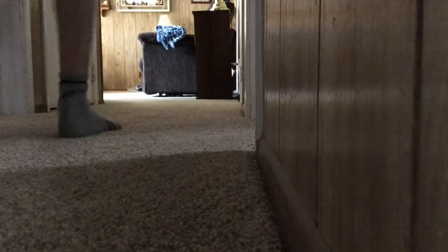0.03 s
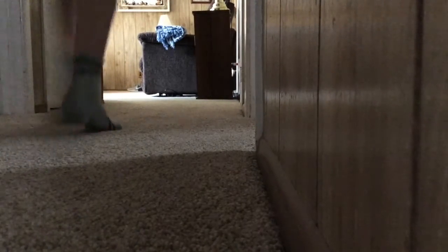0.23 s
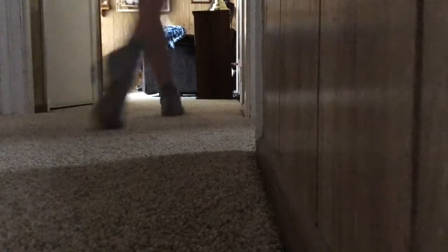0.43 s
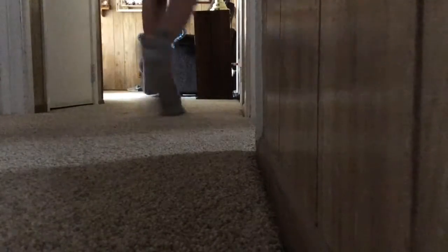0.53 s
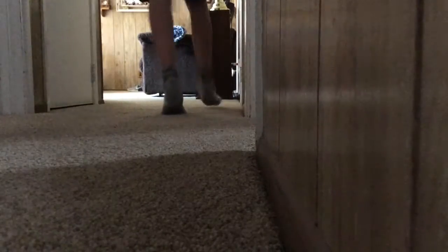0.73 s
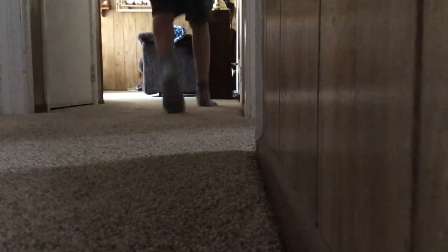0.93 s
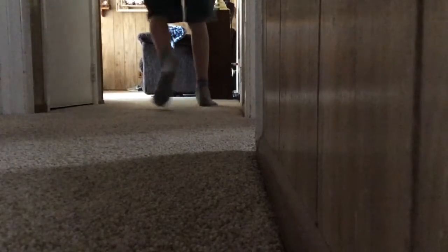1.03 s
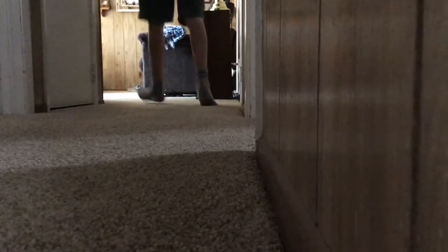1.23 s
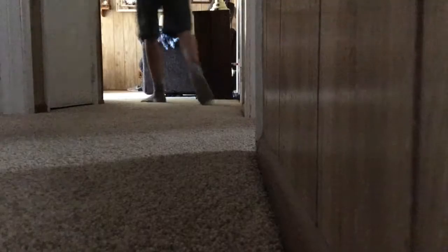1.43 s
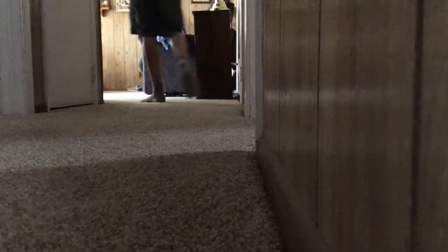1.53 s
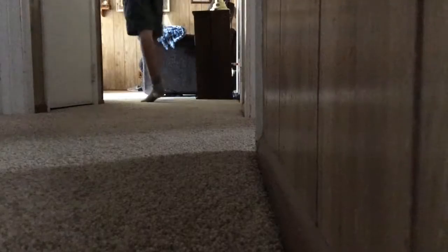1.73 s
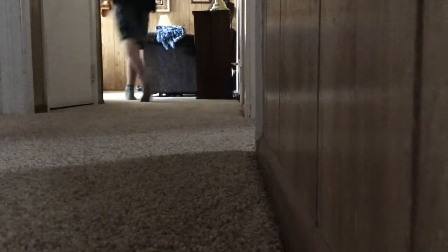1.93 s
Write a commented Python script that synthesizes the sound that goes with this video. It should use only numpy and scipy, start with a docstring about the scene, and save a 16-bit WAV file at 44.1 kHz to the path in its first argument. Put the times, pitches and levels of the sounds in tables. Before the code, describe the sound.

Someone in socks walks away along a carpeted hallway, heard from the floor. A strong woody thump opens, a weaker double thud follows, a crisp snap cuts through, then faint steps and tiny ticks recede over quiet rumble.

```python
"""A heavy thump of a boarded floor comes first, as someone in socks walks away down a carpeted hallway,
heard from a microphone on the floor. Heels and soles are pulses that excite floor modes; crushed pile,
scuffing socks and the working floor are filtered noise. Dry crackles are resonant noise bursts, one
bright snap is a cluster of decaying bursts, and steady noise gives the house rumble and microphone hiss."""
import sys
import numpy as np
from scipy import signal
from scipy.fft import rfft, irfft
from scipy.io import wavfile
from scipy.ndimage import uniform_filter1d

SR = 44100
rng = np.random.default_rng(int(sys.argv[2]) if len(sys.argv) > 2 else 0)


def boost(x):
    """Linear amplitude factor 10**(x/20) for a level x in decibels (scalar or array-like)."""
    u = np.asarray(x, float) / 20
    return 10 ** u


def dump(signal):
    """Clip the signal to [-1, 1] and save it as 16-bit WAV at the path in sys.argv[1]."""
    limited = np.clip(np.atleast_2d(signal).T, -1, 1)
    pcm = np.round(limited * 32767).astype(np.int16)
    wavfile.write(sys.argv[1], SR, pcm)


N = 88200  # samples in the scene


def evened(x):
    """Normalisation: scales a signal to unit rms."""
    return x / np.sqrt(np.mean(x ** 2) + 1e-20)


def add(mix, start_s, sound):
    """Superposition: pressures add from the start time on."""
    part = mix[round(start_s * SR):][:len(sound)]
    part += sound[:len(part)]


def coloured(x, points):
    """Spectral shaping: weights each frequency by a table, then restores unit rms."""
    table_hz, db = np.transpose(points)
    hz = np.fft.rfftfreq(len(x), 1 / SR)
    weight = boost(np.interp(np.log(hz + 1), np.log(table_hz + 1), db))
    return evened(irfft(rfft(x) * weight, len(x)))


def grainy(size, grain_db, smooth_s):
    """Amplitude modulation: the level of white noise flickers at random."""
    flicker = evened(uniform_filter1d(rng.standard_normal(size), max(int(smooth_s * SR), 1)))
    return rng.standard_normal(size) * boost(grain_db * flicker)


def band(x, hz, q):
    """Resonance: a second-order filter passes energy near one frequency."""
    return signal.lfilter(*signal.iirpeak(hz, q, SR), x)


def wavelet(hz, cycles, skew=1, peak_skew=1):
    """Impulsive contact: a short push and rebound; skews under 1 sharpen its start and advance its peak."""
    u = np.arange(0, 1, hz / cycles / SR) ** skew
    return np.sin(2 * np.pi * cycles * u) * np.sin(np.pi * u ** peak_skew) ** 2


def curve(points):
    """Envelope: interpolates levels in decibels into gain over time."""
    s, db = np.transpose(points)
    return boost(np.interp(np.arange(N) / SR, s, db))


# spectrum of house rumble and microphone hiss: (f/Hz, relative level/dB)
ROOM_SPECTRUM = [(13, 10), (22, 1), (64, 0), (109, 3), (356, -5.5), (432, -4.5), (602, -11.5),
                 (1340, -24.5), (2020, -22), (3060, -22), (3710, -17.5), (7000, -22), (9220, -18.5),
                 (14300, -31.5), (16000, -49)]


def room_tone():
    """Stationary noise: a fixed spectrum gives rumble below and hiss above."""
    level_db = -56
    return boost(level_db) * coloured(rng.standard_normal(N), ROOM_SPECTRUM)


# spectrum of the floor working under the walker: (f/Hz, relative level/dB)
CREAK_SPECTRUM = [(18, -33), (30, -16), (80, 1.5), (169, -6), (221, -4), (303, -9.5), (370, -11.5),
                  (795, -12.5), (1600, -27.5), (2080, -56), (3520, -120)]
# its swell and fade: (t/s, level/dB)
CREAK_ENVELOPE = [(0, -65), (.05, -39), (.1, -58), (.174, -47.5), (.322, -56.5), (.48, -62), (.54, -43.5),
                  (.718, -57), (.94, -57.5), (1.0, -50.5), (1.18, -56.5), (1.22, -67.5), (1.3, -55),
                  (1.38, -67), (1.57, -59), (2, -61)]


def floor_creak():
    """Structure-borne noise: the loaded floor gives low, unsteady noise under the walker."""
    return curve(CREAK_ENVELOPE) * coloured(grainy(N, 1.77, 0.015), CREAK_SPECTRUM)


# spectrum of sock on pile: (f/Hz, relative level/dB)
SCUFF_SPECTRUM = [(710, -18), (1200, -4), (1830, -3.5), (2290, 0), (2790, -4), (9030, -6), (15000, -22.5)]
# strength of the scuffing: (t/s, level/dB)
SCUFF_ENVELOPE = [(0, -65), (.05, -60), (.27, -57.5), (.36, -64), (.5, -68.5), (.55, -59), (.7, -58.5),
                  (.74, -64), (.9, -58.5), (1.15, -68), (1.4, -69.5), (1.47, -60), (1.68, -62),
                  (1.75, -69.5), (1.87, -63), (1.95, -63), (2, -66)]


def sock_scuff():
    """Friction noise: sock fibres dragged over pile give flickering broadband noise."""
    return curve(SCUFF_ENVELOPE) * coloured(grainy(N, 1.46, 0.004), SCUFF_SPECTRUM)


# pile crushed under the sole: (t/s, level/dB, centre f/Hz, length/s)
PILE_PRESSES = [(.033, -48, 900, .038), (.06, -46, 805, 0.02), (0.233, -56.5, 1020, 0.041),
                (0.495, -51.5, 490, 0.059), (0.587, -57, 630, 0.13), (0.658, -52, 463, 0.067),
                (0.937, -55, 700, 0.063), (1.238, -55, 805, 0.0081), (1.27, -63.5, 1080, 0.089),
                (1.457, -58, 570, 0.058), (1.628, -56.5, 576, 0.056)]


def press(start_s, db, hz, length_s):
    """Compression of a fibrous layer: crushed pile gives a soft, band-limited swell of grains."""
    q, grain_db = 1.37, -1
    grains = grainy(SR // 5, grain_db, 0.0025)
    u = np.minimum(np.arange(SR // 5) / SR / length_s, 1)
    swell = np.sin(np.pi * u ** 0.74)
    return start_s, boost(db) * evened(band(band(grains, hz, q), hz, q)) * swell


# dry crackles: (t/s, level/dB, centre f/Hz, length/s)
DRY_CRACKLES = [(0.253, -60, 4320, 0.0099), (0.54, -63, 2640, 0.027), (0.621, -63, 3470, 0.027),
                (0.664, -56, 3540, 0.034), (.752, -62, 2570, 0.017), (0.78, -63, 3570, 0.031),
                (.807, -61, 4880, 0.0088), (.81, -59.5, 2390, 0.016), (.873, -55.5, 3930, 0.014),
                (1.333, -67.5, 2270, 0.0092), (1.434, -62, 2590, 0.017), (1.463, -53, 3270, 0.0045),
                (1.473, -60, 4860, 0.011), (1.5266, -46.5, 3700, 0.0078), (1.598, -64, 4200, 0.023),
                (1.639, -56, 4070, .022), (1.805, -65.5, 3600, 0.0084), (1.879, -56.5, 3920, .009),
                (1.9047, -51.5, 4420, 0.0023), (1.9077, -51, 3720, 0.0035), (1.932, -61.5, 4120, 0.027),
                (1.972, -61.5, 3860, 0.011)]


def crackle(start_s, db, hz, length_s):
    """Resonant burst: grains excite one band, a decaying tick opens it and the walls add a short tail."""
    q, wide_q, wide_db, grain_db = 2.57, 1.0, -3, 2
    sag_db, tail_db, tail_t60_s = -4, -7, 0.095
    tick_db, tick_t60_s, tick_length_s = 7, 0.017, 0.013
    t = np.arange(SR // 5) / SR
    grains = grainy(len(t), grain_db, 0.0016)
    narrow = evened(band(band(grains, hz, q), hz, q))
    wide = evened(band(grains, hz * 1.14, wide_q))
    tone = narrow + boost(wide_db) * wide
    hold = np.clip(t / 0.00025, 0, 1) * np.clip((length_s - t) / 0.0038 + 1, 0, 1)
    sag = boost(sag_db * (t / length_s - 0.5))
    tail = (1 - hold) * (t > length_s) * boost(tail_db - 60 * (t - length_s) / tail_t60_s)
    # crackles longer than tick_length_s open with a weaker tick
    tick_share = min(tick_length_s / length_s, 1) ** 2
    tick = boost(tick_db - 60 * t / tick_t60_s) * np.sin(2 * np.pi * hz * t) * tick_share
    return start_s, boost(db) * (tone * (hold * sag + tail) + tick)


# quick bursts within the snap: (t/s, level/dB)
BURSTS = [(.9783, -30), (0.9826, -24), (0.985, -24), (.995, -33)]
# spectrum of the snap: (f/Hz, relative level/dB)
SNAP_SPECTRUM = [(1300, -44), (1900, -15), (2400, -3), (3300, -18.5), (4600, -9), (5300, -9), (5900, -.5),
                 (6750, -15), (8400, 4.5), (11000, -9), (15100, -25), (16200, -54)]
# spectrum of its tail in the hallway: (f/Hz, relative level/dB)
SNAP_TAIL_SPECTRUM = [(760, -38), (1300, -20), (1890, -16), (2140, -5), (5790, -9), (6760, -10.5),
                      (8230, 2.5), (15500, -24)]


def snap():
    """Incoherent summation: the powers of quick decaying bursts add, and the hallway reverberates after."""
    rise_s, t60_s, grain_db = 0.0008, 0.028, 3.1
    tail_db, tail_rise_s, tail_t60_s, tail_grain_db = -37.5, 0.005, 0.29, 1.8
    start_s = BURSTS[0][0]
    t = np.arange(SR // 3) / SR
    power = np.zeros(len(t))
    for burst_s, db in BURSTS:
        age = np.maximum(t - burst_s + start_s, 0)
        power += (np.minimum(age / rise_s, 1) * boost(db - 60 * age / t60_s)) ** 2
    direct = np.sqrt(power) * coloured(grainy(len(t), grain_db, 0.00071), SNAP_SPECTRUM)
    decay = boost(tail_db - 60 * t / tail_t60_s) * np.minimum(t / tail_rise_s, 1)
    tail = decay * coloured(grainy(len(t), tail_grain_db, 0.002), SNAP_TAIL_SPECTRUM)
    return start_s, direct + tail


# small dull knocks of toe or joint, without weight: (t/s, level/dB, f/Hz, cycles)
DULL_KNOCKS = [(0.042, -33, 1160, 6.6), (.049, -44, 1650, 8.6), (.061, -43, 1590, 7.0),
               (0.5203, -24.5, 556, 2.6), (.6605, -42, 490, 1.8), (0.6636, -33, 540, 2.9),
               (.948, -41, 640, 5.0)]


def knock(start_s, db, hz, cycles):
    """Light impact: a toe or joint gives a few cycles under a smooth envelope."""
    return start_s, boost(db) * wavelet(hz, cycles)


# modes of the boarded floor: (f/Hz, relative level/dB, decay time T60/s)
FLOOR_MODES = [(88, 1.5, 0.24), (145, 2, 0.23), (226, -3, 0.25), (280, 5, 0.19), (353.5, 4.5, 0.11),
               (454.3, 6.5, 0.1), (714, 9, 0.15), (900, -21, .1), (1080, -16, .1), (1265, -20, .1),
               (1670, -22, .08)]
# weight landing: (t/s, level/dB, contact f/Hz, ring level/dB, f/Hz favoured by that spot)
FOOTFALLS = [(0.061, -13.5, 266, -3.5, 457), (.079, -27, 138, -6, 145), (0.253, -42, 112, -6, 92),
             (0.51, -37.5, 190, -3.5, 226), (0.5442, -27, 61.3, -17, 145), (0.595, -40, 90, 0.5, 88),
             (0.6641, -23, 139, -15.5, 88), (.673, -28, 188, -9.5, 226), (.72, -45, 66.6, -7, 88),
             (.976, -41, 190, 1.5, 145), (.985, -31, 320, -4, 226), (1.24, -42, 300, -7, 280),
             (1.49, -42.5, 188, -13, 226), (1.556, -45, 88.5, -3.5, 145), (1.899, -45, 95.5, -8, 88)]


def thud(start_s, db, hz, ring_db, spot_hz):
    """Modal excitation: a contact pulse rings the boards, booms in the hallway and reflects off a wall."""
    cycles, push_skew, push_peak_skew = 1.195, 0.76, 0.65
    favour_db, favour_octaves = 10, 0.33
    boom_db, boom_t60_s, boom_rise_s = -8, 0.28, 0.004
    echo_s, echo_db = 0.01018, -10.5
    t = np.arange(SR // 2) / SR
    push = wavelet(hz, cycles, push_skew, push_peak_skew)
    modes = np.zeros(len(t))
    for mode_hz, mode_db, t60_s in FLOOR_MODES:
        # modes near the spot's favoured pitch are driven harder
        favour = favour_db * np.exp(-(np.log2(mode_hz / spot_hz) / favour_octaves) ** 2)
        modes += boost(mode_db + favour - 60 * t / t60_s) * np.sin(2 * np.pi * mode_hz * t)
    diffuse = rng.standard_normal(len(t)) * boost(-60 * t / boom_t60_s) * np.minimum(t / boom_rise_s, 1)
    boards = signal.fftconvolve(modes, push)[:len(t)]
    boom = signal.fftconvolve(diffuse, push)[:len(t)]
    ring = boards / abs(boards).max() + boost(boom_db) * boom / abs(boom).max()
    out = boost(ring_db) * ring
    add(out, 0, push)
    add(out, echo_s, boost(echo_db) * push)
    return start_s, boost(db) * out


def scene():
    """Superposition of continuous noises and the timed events of walking."""
    mix = room_tone() + floor_creak() + sock_scuff()
    events = ((press, PILE_PRESSES), (crackle, DRY_CRACKLES), (knock, DULL_KNOCKS), (thud, FOOTFALLS))
    for source, table in events:
        for row in table:
            add(mix, *source(*row))
    add(mix, *snap())
    return mix[None]


def low_pass(x):
    """Removes everything above the highest recorded frequency."""
    return signal.sosfilt(signal.butter(12, 16380, fs=SR, output="sos"), x)


def record(dry):
    """High-pass response: the microphone attenuates the deepest bass."""
    low_cut_hz = 33
    low_cut = signal.butter(4, low_cut_hz, "high", fs=SR, output="sos")
    heard = signal.sosfilt(low_cut, dry)
    return low_pass(heard)


dry = scene()
out = record(dry)
dump(out)
```